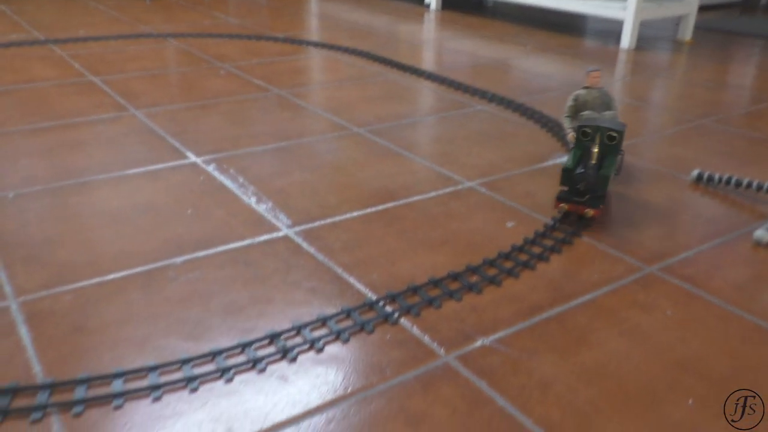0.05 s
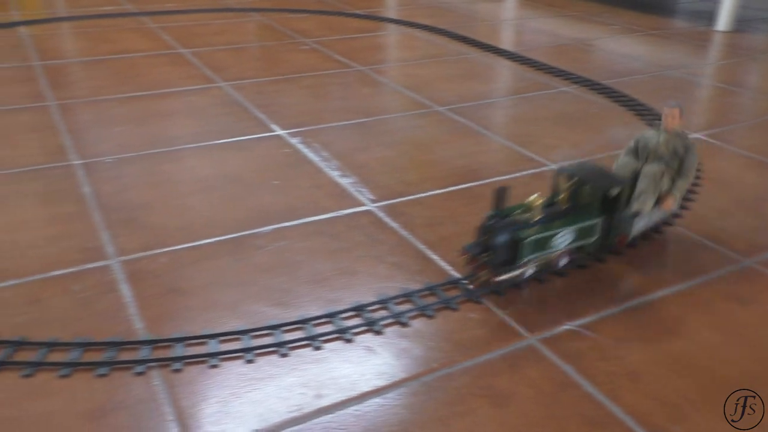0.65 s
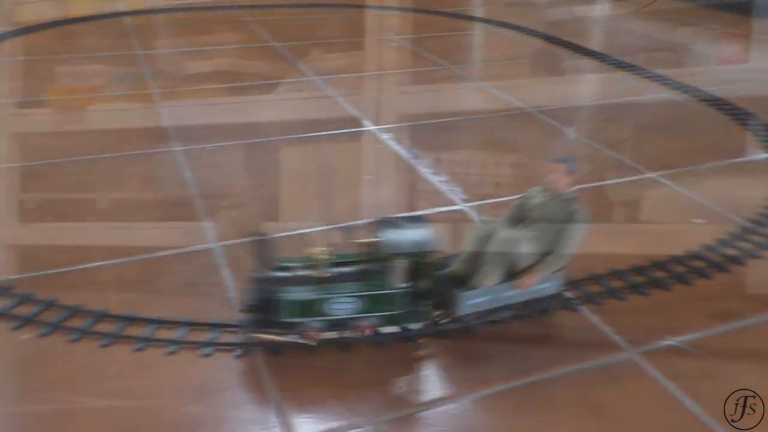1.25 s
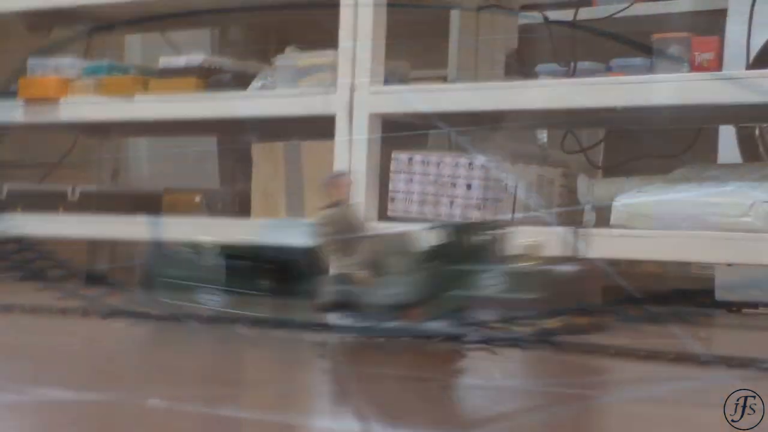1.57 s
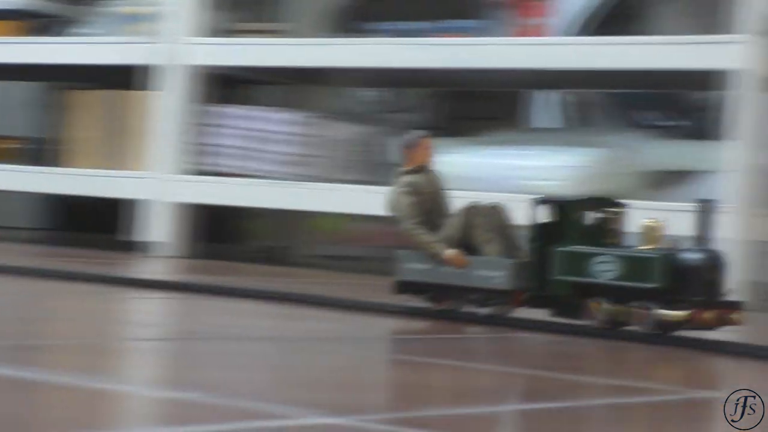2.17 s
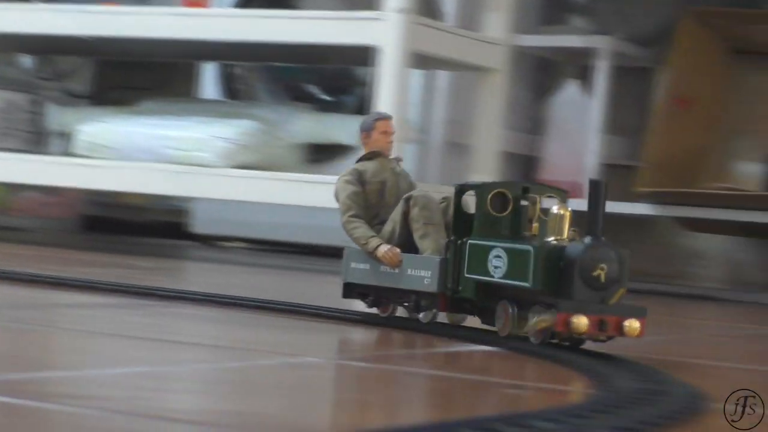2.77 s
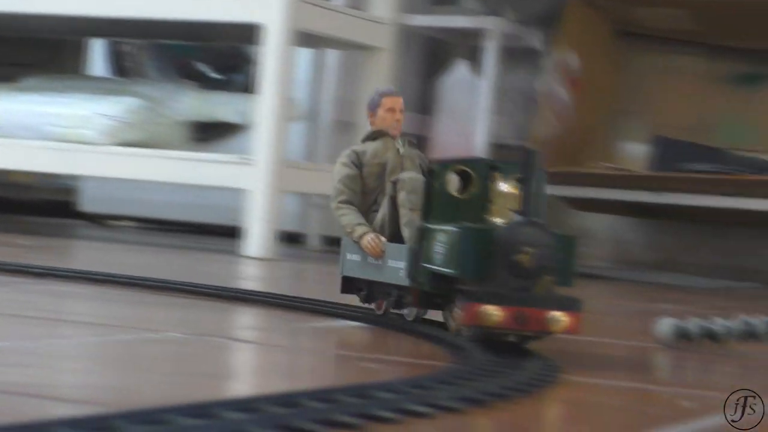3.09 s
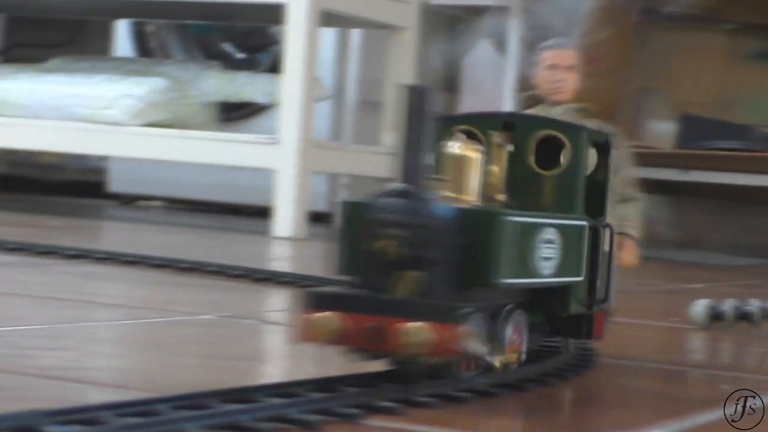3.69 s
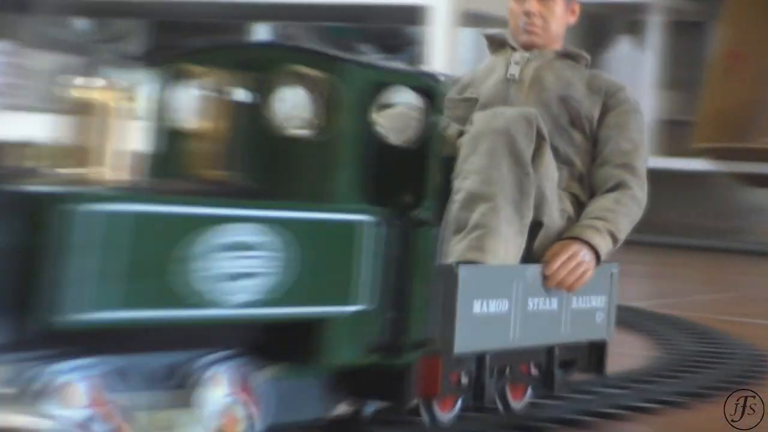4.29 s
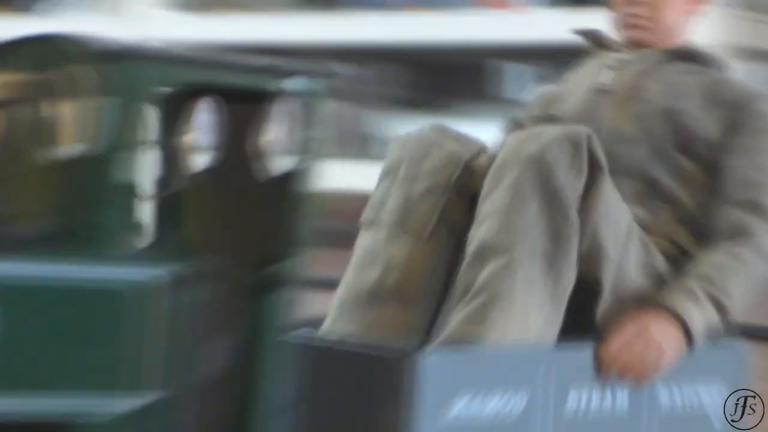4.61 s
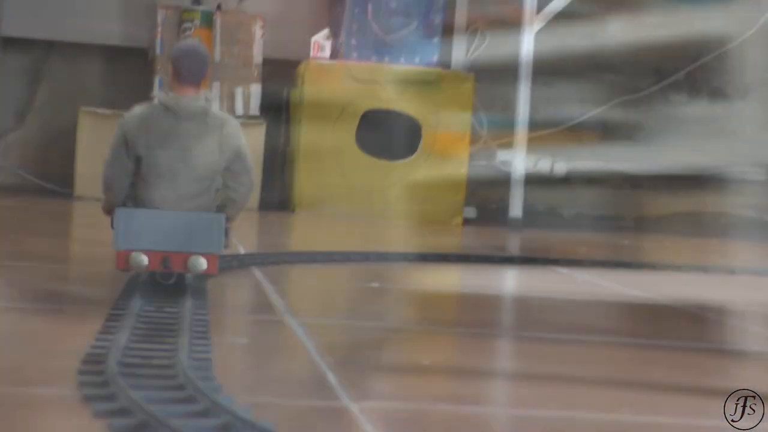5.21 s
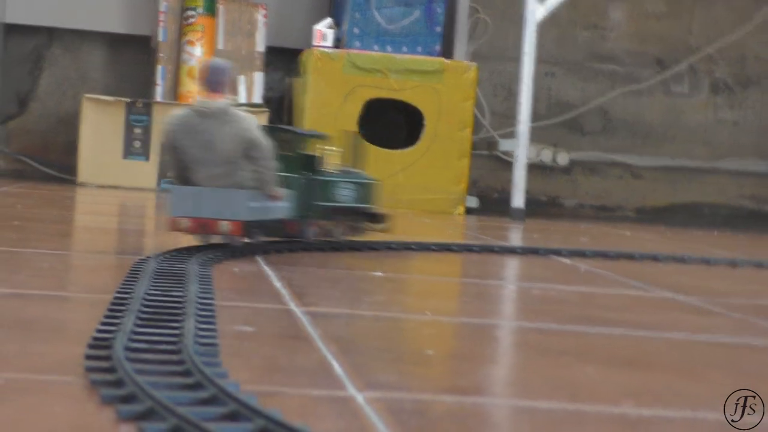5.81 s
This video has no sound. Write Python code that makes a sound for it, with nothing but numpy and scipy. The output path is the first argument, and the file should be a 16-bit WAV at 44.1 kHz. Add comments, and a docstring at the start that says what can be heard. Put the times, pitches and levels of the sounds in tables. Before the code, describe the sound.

A toy steam locomotive runs on track indoors, with quick soft chuffs, hissing, sharp spits of steam and clacking wheels.

```python
"""Toy steam train on a tiled floor

A toy live-steam locomotive pulls a wagon round a loop of track, nearly straight ahead of a stereo
pair of microphones in a room with a short, dull echo. The track drums on the floor; the wheels roll
with a rough metallic rush, sing on the curve and clack over rail joints. Rods clink and the exhaust
beats quickly and softly. Hot water spits in sharp bursts that sizzle away over a steady leak of steam."""
import sys
import numpy as np
from scipy import signal
from scipy.fft import rfft, irfft, next_fast_len
from scipy.io import wavfile
from scipy.ndimage import uniform_filter1d

SR = 44100
rng = np.random.default_rng(int(sys.argv[2]) if len(sys.argv) > 2 else 0)


def put_to_file(sound):
    """Save the sound as 16-bit audio at rate SR, in the file named by the first command-line argument."""
    columns = np.atleast_2d(sound).T  # one column per channel
    safe = np.clip(columns, -1, 1)
    whole_steps = np.round(safe * 32767)
    wavfile.write(sys.argv[1], SR, whole_steps.astype(np.int16))


N = 257979
TIME = np.arange(N) / SR

# Resonances of wheels, frame and rails. Each row: frequency in Hz, width in Hz, gain in dB.
CHASSIS_MODES = [(620, 100, -17), (870, 172, -8.5), (1049, 91, -1.5), (1189, 89, -3.5), (1296, 72, -1.5),
                 (1397, 95, -3), (1554, 101, -5), (1998, 90, -5), (2240, 140, -9.5), (2640, 147, -5.5),
                 (2830, 120, -9), (3310, 510, -13)]
# Colour of escaping steam. Each row: frequency in Hz, relative level in dB.
STEAM_SPECTRUM = [(3000, -21), (4500, 6.5), (5800, 1.5), (7500, 7.5), (9600, 5), (10100, 6), (10550, 2),
                  (11800, 3), (12900, -2), (13700, 0), (14500, -5), (16500, -15)]
# How hard the wheels roll. Each row: time in seconds, relative level in dB.
ROLLING_LEVELS = [(0, -34), (.5, -34), (1.25, -34), (1.7, -30), (2.6, -30.5), (3.0, -33.5), (3.35, -31.5),
                  (3.6, -34.5), (4.0, -29.5), (4.42, -33), (4.6, -29), (4.8, -34), (5.1, -32), (5.4, -34),
                  (5.85, -35)]


def from_db(db):
    """Decibels to gain."""
    return 10 ** (np.asarray(db) / 20)


def rms_one(x):
    """Scale to unit power."""
    return x / np.sqrt(np.mean(x ** 2) + 1e-20)


def match_energy(x, envelope):
    """Give a sound the energy of an envelope."""
    return x * np.linalg.norm(envelope) / np.linalg.norm(x)


def in_time(rows):
    """Each column of a timed curve, sample by sample."""
    seconds, *columns = np.transpose(rows)
    return [np.interp(TIME, seconds, column) for column in columns]


def colour(x, points):
    """Shape a sound by a spectrum of (Hz, dB) points."""
    hz, db = np.transpose(points)
    size = next_fast_len(x.shape[-1])
    bin_hz = np.maximum(np.arange(size // 2 + 1) * SR / size, 1)
    gain = from_db(np.interp(np.log(bin_hz), np.log(hz), db))
    return irfft(rfft(x, size) * gain, size)[..., :x.shape[-1]]


def lowpass(x, hz, order=2):
    """Roll off the sound above a frequency."""
    return signal.sosfilt(signal.butter(order, hz, fs=SR, output="sos"), x)


def noise(points):
    """Noise of unit power that falls away steeply beyond the ends of its spectrum."""
    closed = [(points[0][0] / 2, -60), *points, (points[-1][0] * 2, -60)]
    return rms_one(colour(rng.standard_normal(N), closed))


def drift(per_s):
    """A random wander of unit power that turns `per_s` times a second."""
    turns = rng.standard_normal(N // 10)
    return rms_one(np.interp(TIME * per_s, np.arange(len(turns)), turns))


def shifting(hiss, patchy_db):
    """Let the colour of a hiss shift by chance from moment to moment; unit power."""
    cells = signal.stft(hiss, nperseg=256)[2]
    patches = uniform_filter1d(rng.standard_normal(cells.shape), size=3, axis=0)
    patches = rms_one(uniform_filter1d(patches, size=7, axis=1))
    return rms_one(signal.istft(cells * from_db(patchy_db * patches))[1][:N])


def resonate(x, modes):
    """Parallel resonances of alternating sign."""
    out = 0
    for k, (hz, width_hz, db) in enumerate(modes):
        radius = np.exp(-np.pi * width_hz / SR)
        poles = [1, -2 * radius * np.cos(2 * np.pi * hz / SR), radius ** 2]
        gain = (-1) ** k * from_db(db) * (1 - radius ** 2) / 2
        out = out + gain * signal.lfilter([1, 0, -1], poles, x + 1e-18)
    return out


def ringing(hz, width_hz):
    """A resonance shaken at random: a narrow, rough band of unit power whose pitch may move."""
    shake = lowpass(rng.standard_normal((2, N)), width_hz)
    phase = 2 * np.pi * np.cumsum(hz * np.ones(N)) / SR
    return rms_one(shake[0] * np.cos(phase) + shake[1] * np.sin(phase))


def burst(start_s, rise_s, decay_s, size=N):
    """An envelope that rises quickly, then dies away."""
    age = np.maximum(TIME[:size] - start_s, 0)
    decays = np.clip((age - rise_s) / decay_s, 0, 20)
    return np.minimum(age / rise_s, 1) * np.exp(-decays)


def swell(crest_s, half_length_s):
    """A smooth rise and fall round a moment."""
    return np.cos(np.pi / 2 * np.clip((TIME - crest_s) / half_length_s, -1, 1)) ** 2


def room(train, wet_db=-10.0, side_db=-9.0, t60_s=0.15, dull_hz=5000, first_s=0.0028, spots=16):
    """Tiles and shelves send back a short dull tail whose echoes change as the train moves on."""
    age, place = TIME[:SR // 3], np.linspace(0, spots - 1, N)
    decay = from_db(-60 * age / t60_s) * (age > first_s)
    wet = np.zeros((2, N + len(age)))
    for spot in range(spots):
        tails = rng.standard_normal((2, len(age))) * decay
        tails = lowpass(tails / np.linalg.norm(tails, axis=1, keepdims=True), dull_hz, order=1)
        near = np.flatnonzero(np.abs(place - spot) < 1)
        crossfade = np.cos(np.pi / 2 * (place[near] - spot))
        echo = signal.fftconvolve([train[near] * crossfade], tails, axes=1)
        wet[:, near[0]:near[0] + echo.shape[1]] += echo
    mid, side = wet[:, :N]
    return from_db(wet_db) * mid + from_db(side_db) * side * [[1], [-1]]


def floor_rumble(level_db=3.0, side_db=-9.5):
    """The track drums on the floor; this low sound reaches the microphones from all round."""
    # Strength of the drumming. Each row: time in seconds, relative level in dB.
    drumming = [(0, -48.5), (1.35, -51.5), (2.3, -50), (2.55, -48.5), (3.2, -48), (3.45, -50), (4.6, -52.5),
                (5.15, -49), (5.85, -54)]
    # Colours of its centre and its diffuse part. Each row: frequency in Hz, relative level in dB.
    mid_spectrum = [(25, -16), (45, -12.5), (80, -6.5), (140, -1.5), (250, -2.5), (345, -0.5), (410, -3),
                    (700, -0.5), (1200, -12)]
    side_spectrum = [(25, -16), (60, -4), (130, -3.5), (250, -2), (600, -6)]
    rumble_db, = in_time(drumming)
    mid, side = noise(mid_spectrum), noise(side_spectrum)
    return from_db(rumble_db + level_db) * (mid + from_db(side_db) * side * [[1], [-1]])


def sleepers(level_db=-1.0, hz=514.2, width_hz=38, uneven_db=5.0):
    """The hollow sleepers rumble faintly and unevenly under the wheels."""
    # How loosely they rock on the tiles. Each row: time in seconds, relative level in dB.
    rocking = [(0, -67), (.5, -47.5), (1.1, -56.5), (1.85, -48.5), (2.55, -50), (2.78, -47.5), (3.4, -51),
               (3.8, -46.5), (4.5, -49), (4.95, -51), (5.2, -46.5), (5.85, -56.5)]
    rocking_db, = in_time(rocking)
    return from_db(rocking_db + level_db + uneven_db * np.tanh(drift(19))) * ringing(hz, width_hz)


def rail_song(rolling_db, width_hz=55, flicker_db=2.0):
    """The rail rings fitfully in a narrow band whose pitch wanders as the wheels move along it."""
    # How freely it sings. Each row: time in seconds, level in dB against the rolling, pitch in Hz.
    song = [(0, -11, 1294), (1.3, -17, 1285), (2.2, -9, 1288), (2.72, -2.5, 1238), (3.15, -6, 1186),
            (3.55, -9, 1206), (4.0, -13.5, 1253), (5.85, -9.5, 1256)]
    song_db, hz = in_time(song)
    ring = ringing(hz, width_hz) * from_db(flicker_db * np.tanh(drift(14)))
    return from_db(rolling_db + song_db) * rms_one(ring)


def wheel_song(rolling_db, rub_db=-8.0, steady_db=-20.0, hz=1984, width_hz=38):
    """The rolling keeps a wheel ringing roughly; where it rubs, the ringing swells out."""
    # Rubs along the curve. Each row: crest in seconds, relative peak in dB, half length in seconds.
    rubs = [(0.955, -31.5, .06), (1.62, -30, .05), (2.5, -33, 0.036), (2.667, -30, 0.038),
            (2.88, -31, 0.13), (3.123, -33, 0.067), (4.343, -32, 0.098), (4.48, -22, 0.025),
            (4.562, -29, 0.06), (4.66, -33, 0.076)]
    swells = sum(from_db(peak_db) * swell(crest_s, half_s) for crest_s, peak_db, half_s in rubs)
    return np.hypot(from_db(rub_db) * swells, from_db(rolling_db + steady_db)) * ringing(hz, width_hz)


def flange_squeaks(level_db=-8.0, width_hz=210):
    """Flanges scrape the rail, each time with a brief, rough band of ringing that swells and fades."""
    # Scrapes. Each row: crest in seconds, pitch in Hz, relative peak in dB, half length in seconds.
    scrapes = [(0.699, 3290, -25, .018), (0.806, 3580, -27, 0.018), (0.82, 2793, -21.5, 0.019),
               (1.17, 2870, -21, 0.0098), (2.07, 3060, -24, 0.018), (2.078, 3590, -23, 0.018),
               (2.465, 3440, -26, .04), (2.558, 3290, -30, .03), (2.987, 3460, -30, 0.032),
               (3.0, 4500, -27, 0.032), (5.175, 4400, -25, 0.028)]
    out = np.zeros(N)
    for crest_s, hz, peak_db, half_s in scrapes:
        rub = swell(crest_s, half_s)
        out += from_db(peak_db + level_db) * match_energy(rub * ringing(hz, width_hz), rub)
    return out


def wheel_rush(rolling_db, level_db=-1.5, judder_db=0.8, grit_db=0.5, contact_hz=2000):
    """Countless tiny, soft bumps between wheel and rail shake the chassis."""
    judder = judder_db * drift(60)
    bumps = rng.standard_normal(N) * from_db(grit_db * drift(900) + judder)
    shaking = resonate(lowpass(bumps, contact_hz), CHASSIS_MODES)
    return from_db(rolling_db + level_db) * rms_one(shaking)


def knocks(per_s=12, over_rolling_db=4.5, scatter_db=3.5, edge_db=-10, ring_db=-11.0):
    """Couplings and rods knock lightly at random, following the rolling level; rows for clacks()."""
    chance = rng.random((100, 4))
    start_s = (np.arange(len(chance)) + chance[:, 0]) / per_s
    scatter = scatter_db * (2 * chance[:, 1:3] - 1)
    peak_db = np.interp(start_s, *np.transpose(ROLLING_LEVELS)) + over_rolling_db + scatter[:, 0]
    ring_hz = 2550 * (2900 / 2550) ** chance[:, 3]
    rows = np.transpose([start_s, peak_db, edge_db + scatter[:, 1], ring_hz, peak_db + ring_db])
    return rows[start_s < (N - SR // 19) / SR]


def clacks(body_db=-6.5, edge_db=-3.0, metal_db=-3.5, bounce_db=-18.0, ring_width_hz=170):
    """A wheel drops into a joint: a blow and brief chatter ring the chassis; the metal rattles on."""
    # Wheels meeting rail joints. Each row: start in seconds, relative peak in dB,
    # brightness of the edge in dB, ring pitch in Hz, relative ring level in dB.
    joints = [(0.5705, -27, -3, 3316, -28), (0.6116, -21.5, -8, 3359, -23), (0.6863, -23, 0, 3488, -26),
              (0.7529, -16.5, -10, 2620, -25), (0.798, -24, 0, 3520, -33), (0.9485, -26, 2, 2800, -25),
              (1.0362, -22, 0.5, 2360, -19), (1.078, -21.5, -4, 2830, -20), (1.2213, -24, -11, 2820, -20),
              (1.3636, -20, -2, 2850, -18.5), (1.3862, -23, -3, 2660, -22), (1.451, -22, -1, 2920, -22),
              (1.474, -24, -3, 2720, -25), (1.5915, -15, -14, 2830, -23), (2.0517, -14, -14, 2670, -18),
              (2.1329, -17, -19, 2680, -28), (2.8754, -30, 8, 3380, -26), (2.8905, -20, 2.5, 3180, -27),
              (3.6803, -20, -9, 3450, -20), (3.7215, -15.5, -10.5, 2010, -25),
              (3.7778, -22.5, -4.5, 2640, -22), (3.803, -18, -6.5, 3340, -22),
              (3.8732, -15, -9.5, 2000, -18), (4.0835, -12.5, -8.5, 2842, -20.5),
              (4.1712, -10.5, -15, 2630, -33), (4.2195, -21, -5, 2646, -28), (4.3115, -18, -9, 3400, -28),
              (4.3535, -16.5, -6, 3273, -20), (4.3844, -14.5, -8, 3420, -20.5),
              (4.5178, -11, -8.5, 2740, -27), (4.6107, -10, -11.5, 2000, -32), (4.634, -25, 0, 3574, -31),
              (4.6902, -20.5, -8, 2153, -22.5), (4.7636, -16, -10, 2240, -25),
              (4.9848, -14.5, -10.5, 2583, -29), (5.062, -14, -6.5, 3359, -29),
              (5.077, -16, -13, 2615, -32), (5.1354, -25, 0, 2580, -22), (5.5078, -25, 0.5, 3440, -37)]
    # Colour of a blow's bright edge. Each row: frequency in Hz, relative level in dB.
    edge_spectrum = [(1500, 6), (2400, -12), (3600, 3), (5500, -1), (7000, -5), (11000, 0), (14000, -7),
                     (16500, -41)]
    out, chatter, edge = np.zeros(N), rng.standard_normal(N), noise(edge_spectrum)
    size, rise_s = SR // 20, .0013
    rattle = burst(0, rise_s, decay_s=.0052, size=size)
    bounce = burst(0, rise_s, decay_s=.013, size=size)
    contact = burst(0, rise_s, decay_s=.003, size=size) + from_db(bounce_db) * bounce
    blow = np.arange(size) == round(rise_s * SR)
    for start_s, peak_db, bright_db, ring_hz, ring_db in [*joints, *knocks()]:
        at = round(start_s * SR) + np.arange(size)
        force = blow + 1.6 * match_energy(chatter[at] * contact, blow)
        modes = [(hz, width_hz, db + 3 * rng.standard_normal()) for hz, width_hz, db in CHASSIS_MODES]
        body = from_db(body_db) * match_energy(resonate(force, modes), contact)
        crack = from_db(edge_db + bright_db) * match_energy(edge[at] * contact, contact)
        ring = match_energy(resonate(chatter[at], [(ring_hz, ring_width_hz, 0)]) * rattle, rattle)
        out[at] += from_db(peak_db) * (body + crack) + from_db(ring_db + metal_db) * ring
    return out


def rod_clinks(per_s=45, detune=0.01, decay_s=0.0092, scatter_db=4.0):
    """Play in the rods lets them chatter unevenly; each clink strikes their modes with its own force."""
    # Modes of the rods. Each row: frequency in Hz, relative level in dB.
    rod_modes = [(2540, -4), (2670, -3.5), (2840, -5)]
    # How hard they clink. Each row: time in seconds, relative level in dB.
    rattling = [(0, -42), (.6, -32), (.95, -21), (1.3, -27), (1.8, -25), (2.1, -23), (2.45, -25),
                (2.8, -40), (3.3, -31.5), (4.1, -27), (4.85, -52), (5.15, -35), (5.4, -39), (5.85, -45)]
    rattle_db, = in_time(rattling)
    out, size = np.zeros(N), SR // 20
    age = TIME[:size]
    for k, (late, bend, *forces) in enumerate(rng.standard_normal((400, 2 + len(rod_modes)))):
        start = round((k + late / 2) / per_s * SR)
        if 0 <= start < N - size:
            for (hz, db), force in zip(rod_modes, forces):
                ring = np.sin(2 * np.pi * hz * (1 + detune * bend) * age) * np.exp(-age / decay_s)
                gain = from_db(rattle_db[start] + db + scatter_db * np.tanh(force)) / 2
                out[start:start + size] += gain * rng.choice([-1, 1]) * ring
    return out


def exhaust(effort_db, beats_per_s=14.5, unsteady=0.05, beat_db=1.0, flutter_db=1.2):
    """Steam leaves the chimney in quick shallow puffs, one for each piston stroke."""
    # Colour of the chimney's breath. Each row: frequency in Hz, relative level in dB.
    chimney_spectrum = [(1200, 0.5), (1850, -0.5), (2400, 2.5), (2620, 2.5), (2880, 3.5), (3030, -1),
                        (3300, 1.5), (3520, 0.5), (3900, -3.5), (4800, -10), (6000, -15), (9000, -14)]
    strokes = np.cumsum(beats_per_s * (1 + unsteady * drift(4.36))) / SR
    puff = np.sin(2 * np.pi * strokes) + .5 * np.sin(4 * np.pi * strokes)   # opens fast, fades slowly
    return from_db(effort_db + beat_db * puff + flutter_db * drift(250)) * noise(chimney_spectrum)


def droplets(per_s, size_db, limit):
    """Random impulses whose levels stray from unity by up to `limit` times `size_db`."""
    hits = rng.random(N) < per_s / SR
    return hits * from_db(size_db * np.minimum(rng.exponential(1, N), limit))


def crackle(size_db, per_s=900, decay_s=.0006):
    """Tiny droplets of uneven size burst at random; an envelope of unit power."""
    energy = droplets(per_s, size_db, limit=3.5) ** 2
    pops = signal.lfilter([1], [1, -np.exp(-1 / (decay_s * SR))], energy + 1e-18)
    return np.sqrt((1 + pops / pops.mean()) / 2)


def sputter(per_s=350, width_hz=60, low_hz=7200, high_hz=14300, count=28):
    """Bursting droplets each sing one of a set of brief high notes; unit power."""
    pops = droplets(per_s, size_db=0, limit=3)
    note_of_pop = rng.integers(0, count, N)
    pitches = np.geomspace(low_hz, high_hz, count) * rng.uniform(.99, 1.01, count)
    levels_db = np.interp(pitches, *np.transpose(STEAM_SPECTRUM))
    return rms_one(sum(resonate(pops * (note_of_pop == k), [(pitches[k], width_hz, levels_db[k])])
                       for k in range(count)))


def steam_leak(effort_db, level_db=-8.0):
    """Wet steam hisses out without pause, as hard as the engine blows, and crackles finely."""
    hiss = shifting(noise(STEAM_SPECTRUM), patchy_db=3.5)
    return from_db(effort_db + level_db) * hiss * crackle(size_db=4.0)


def spits(flash_db=-14.5, linger_db=-21.0, sizzle_db=-1.0, notes_db=-8.5, ebb_s=0.05):
    """A drop flashes to steam in a bright burst; its remains, and the surges, sizzle on hot metal."""
    # Spits of hot water. Each row: start in seconds, relative peak in dB, burst decay in seconds,
    # relative sizzle level in dB.
    drops = [(0.1865, -16, 0.0028, -35.5), (0.2503, -7, 0.022, -31.5), (0.498, -25, .005, -37.5),
             (0.555, -16, 0.0027, -34.5), (0.61, -24, .012, -35.5), (0.817, -11, 0.0058, -31.5),
             (0.9477, -12.5, 0.011, -37), (1.0355, -9.5, 0.007, -32.5), (1.077, -10, 0.009, -32),
             (1.362, -23, .005, -37.5), (1.4516, -23, .006, -35.5), (1.5873, -27, .006, -34.5),
             (2.0438, -15.5, 0.014, -48), (2.074, -17.5, 0.024, -52), (2.8206, -26, 0.005, -36.5),
             (2.886, -11, 0.011, -32), (3.262, -22, 0.0066, -33.5), (3.342, -7, 0.012, -34.5),
             (3.9233, -6.5, 0.0066, -32), (3.966, -16, 0.011, -32.5), (4.175, -16, .009, -36),
             (4.2183, -4, 0.005, -32.5), (4.6127, -12, .004, -35.5), (5.0645, -15, 0.005, -32),
             (5.231, -10, 0.0039, -37.5), (5.4166, -22, .006, -37.5), (5.6593, -24, 0.0063, -41.5)]
    # Surges of wet steam. Each row: crest in seconds, relative level in dB, swell time in seconds.
    surges = [(0.0, -30, .02), (1.19, -35, .02), (1.8, -42, 0.054), (2.09, -29.5, 0.042), (2.4, -39, 0.018),
              (2.5, -31, 0.034), (3.0, -31.5, 0.049), (3.41, -34.5, .03)]
    # Colours of the burst and the duller sizzle. Each row: frequency in Hz, relative level in dB.
    flash_spectrum = [(2000, -22), (4000, -8), (5500, -8.5), (7800, -2), (9500, 2), (10100, 6), (10600, -2),
                      (11900, 2.5), (12900, -5.5), (13650, 3.5), (14500, -6), (15600, -9), (16500, -17)]
    sizzle_spectrum = [(2000, -4), (4000, -2.5), (5500, -5), (7500, 0), (9600, 1.5), (10100, 1),
                       (10600, -4.5), (11800, -3.5), (12900, -9), (13700, -9), (14500, -12), (16500, -26)]
    jet = shifting(noise(flash_spectrum), patchy_db=4)
    spray = shifting(noise(sizzle_spectrum), patchy_db=3) * crackle(size_db=-1.0)
    spray += from_db(notes_db) * sputter()
    flashes, sizzle_power = np.zeros((2, N))
    for start_s, peak_db, decay_s, tail_db in drops:
        linger = from_db(linger_db) * burst(start_s, rise_s=.005, decay_s=.036)
        flashes += from_db(peak_db) * (burst(start_s, rise_s=.0014, decay_s=decay_s) + linger)
        sizzle_power += (from_db(tail_db) * burst(start_s, rise_s=.005, decay_s=.12)) ** 2
    for crest_s, crest_db, swell_s in surges:
        slope_s = np.where(TIME < crest_s, swell_s, ebb_s)
        sizzle_power += (from_db(crest_db) * np.exp(-np.abs(TIME - crest_s) / slope_s)) ** 2
    return from_db(flash_db) * flashes * jet + from_db(sizzle_db) * np.sqrt(sizzle_power) * spray


def scene():
    """The train in its room, kept nearly straight ahead of the microphones."""
    # How hard the engine blows, as heard along the loop. Each row: time in seconds, relative level in dB.
    effort = [(0, -36.5), (.55, -35.5), (1.0, -33), (1.25, -36.5), (1.85, -35.5), (2.07, -34.5),
              (2.22, -36), (2.5, -31.5), (2.8, -36.5), (3.5, -35.5), (4.6, -35), (4.85, -38), (5.13, -33),
              (5.4, -39.5), (5.85, -39.5)]
    # The train's place between the microphones. Each row: time in seconds, left minus right in dB.
    place = [(0, -.8), (1.2, -1.2), (1.7, -0.5), (4.6, 0), (5.2, 1.5), (5.85, -1)]
    rolling_db, = in_time(ROLLING_LEVELS)
    effort_db, = in_time(effort)
    pan_db, = in_time(place)
    wheels = wheel_rush(rolling_db) + rail_song(rolling_db) + wheel_song(rolling_db)
    track = sleepers() + clacks() + flange_squeaks()
    engine = exhaust(effort_db) + rod_clinks() + spits() + steam_leak(effort_db)
    train = wheels + track + engine
    direct = train * from_db(pan_db / 2 * [[1], [-1]])
    return direct + room(train) + floor_rumble()


def record(dry, cutoff_hz=16500):
    """A stereo pair of microphones, each with a slight colour of its own; the top is cut steeply."""
    # Balance of the pair. Each row: frequency in Hz, left minus right in dB.
    balance = [(60, 1.5), (200, 0.5), (700, -1.5), (1290, 1.8), (2400, 2.5), (5000, 0.5), (9000, 0.3),
               (13000, 0.8)]
    left = colour(dry[0], [(hz, db / 2) for hz, db in balance])
    right = colour(dry[1], [(hz, -db / 2) for hz, db in balance])
    return signal.sosfilt(signal.ellip(10, .2, 80, cutoff_hz, fs=SR, output="sos"), [left, right])


dry = scene()
out = record(dry)
put_to_file(out)
```